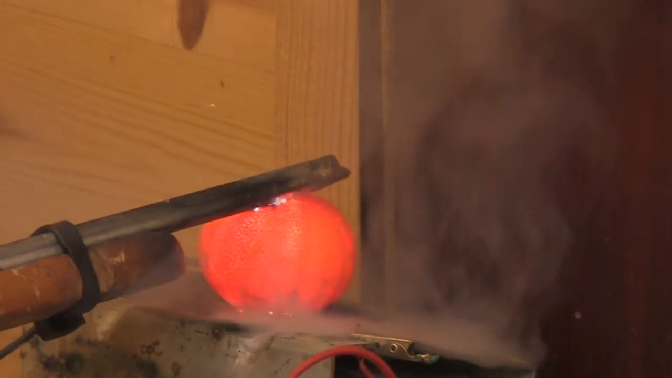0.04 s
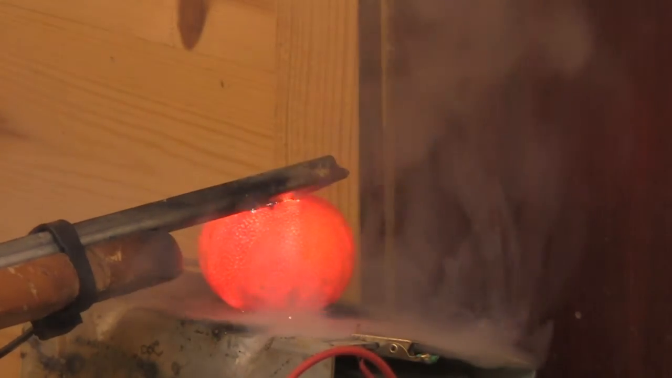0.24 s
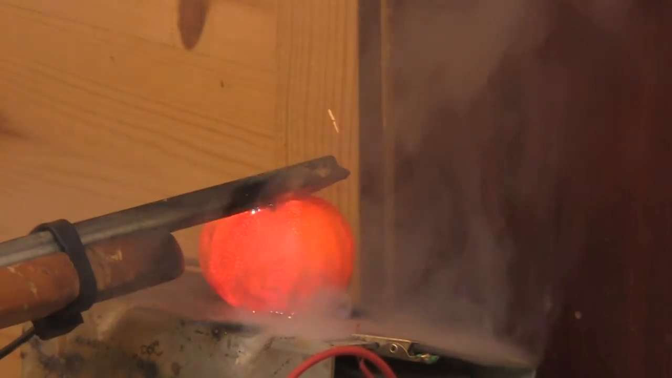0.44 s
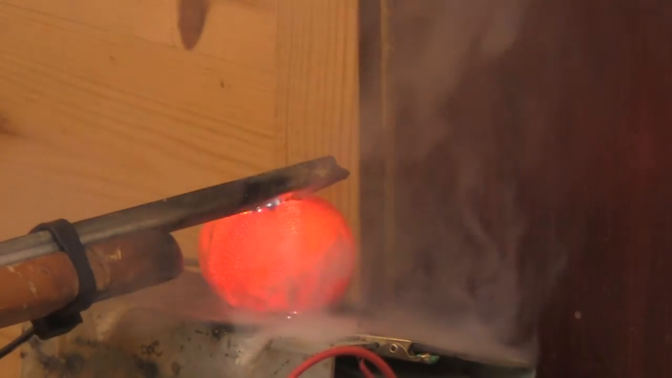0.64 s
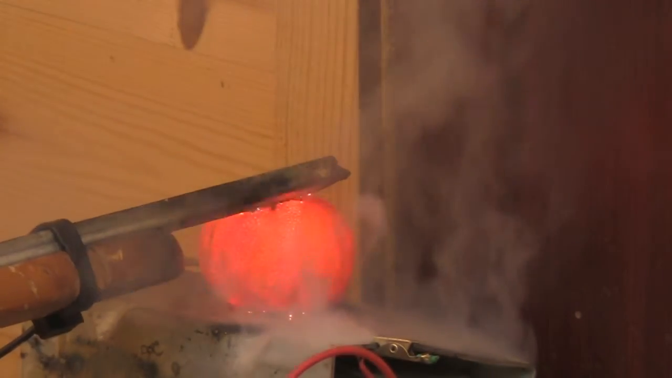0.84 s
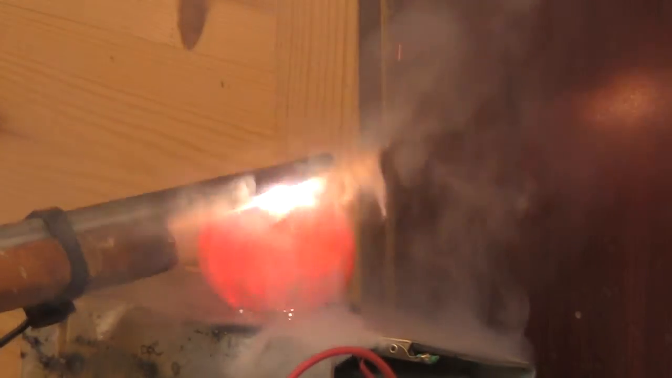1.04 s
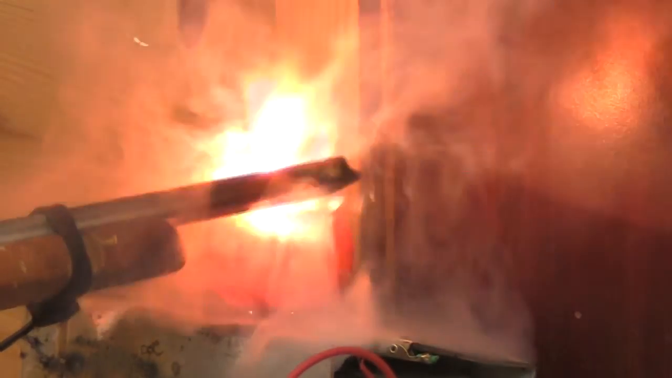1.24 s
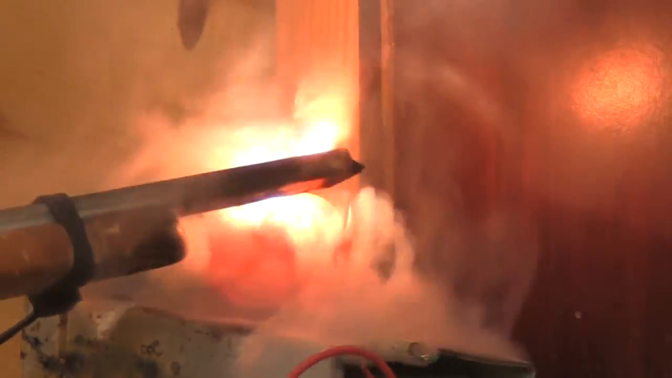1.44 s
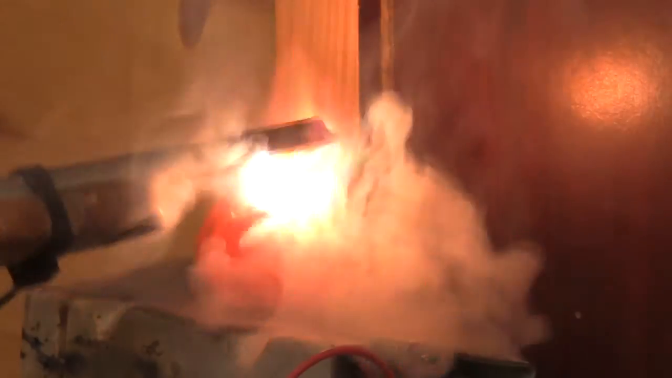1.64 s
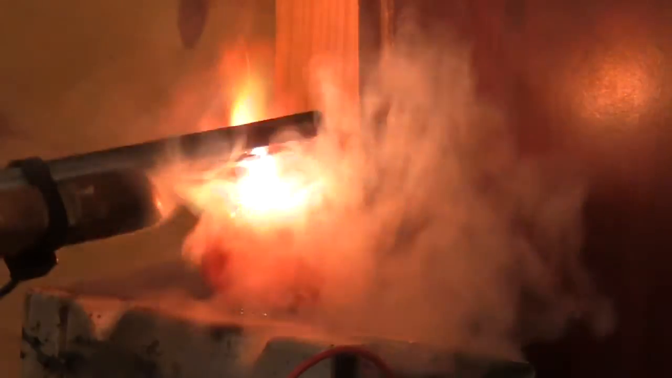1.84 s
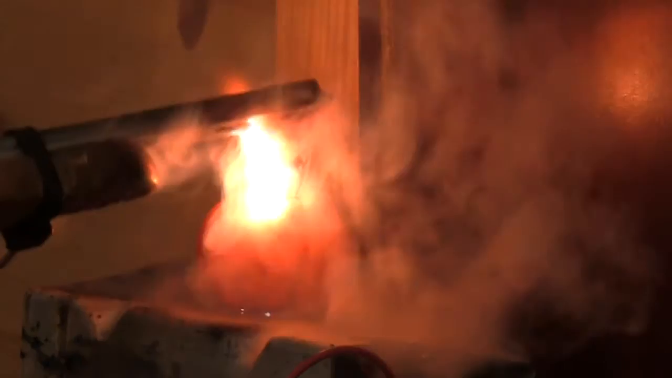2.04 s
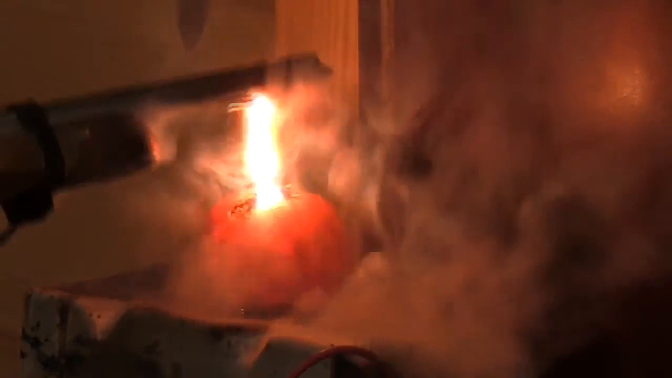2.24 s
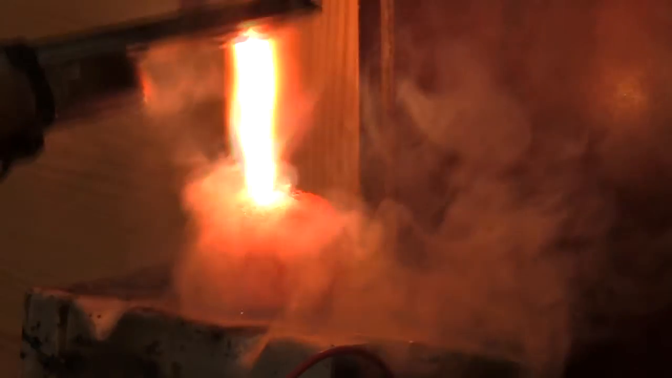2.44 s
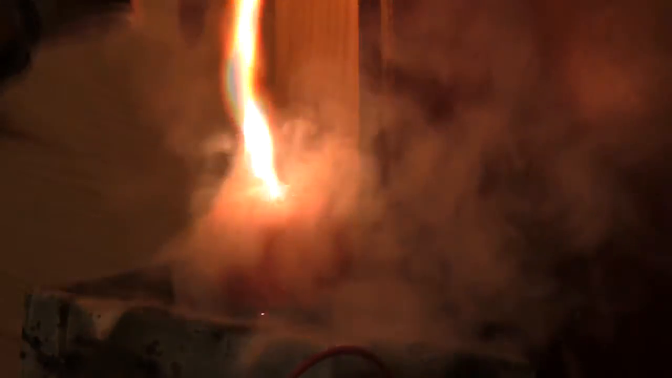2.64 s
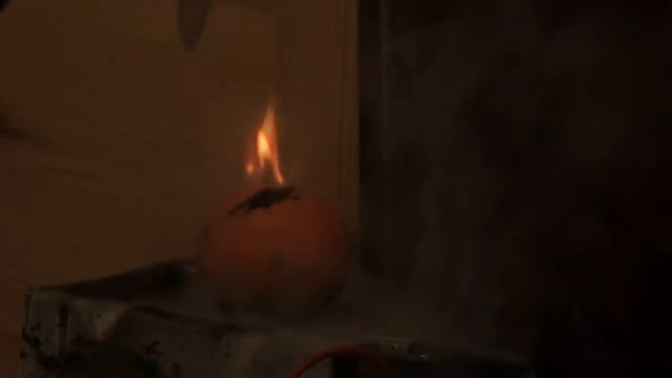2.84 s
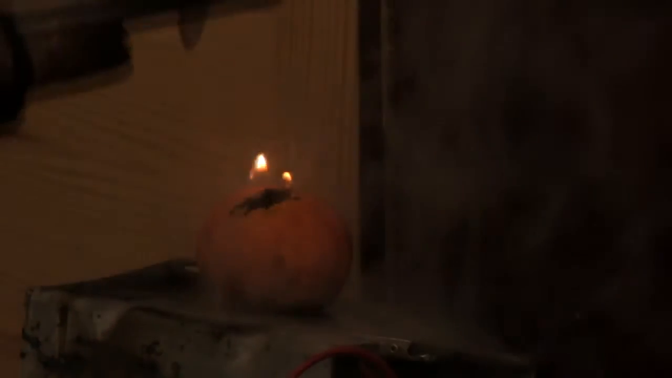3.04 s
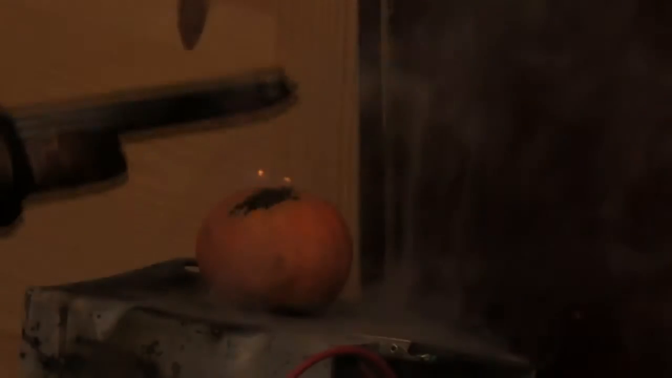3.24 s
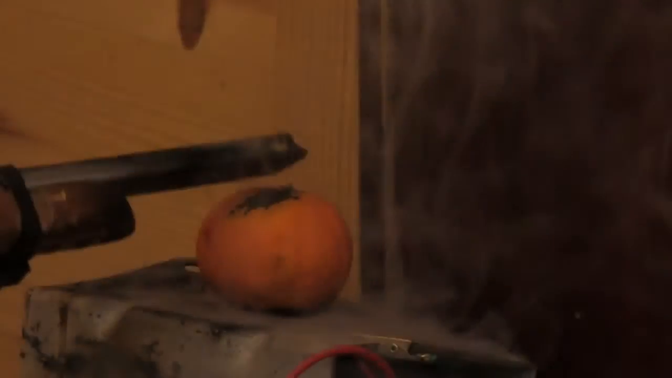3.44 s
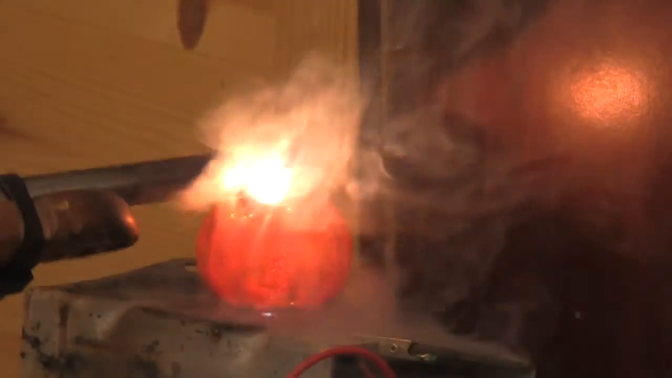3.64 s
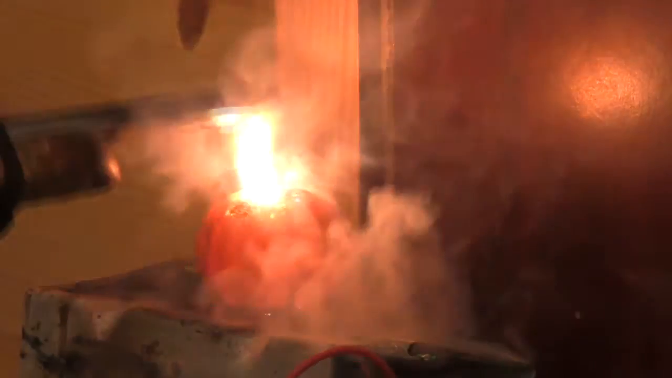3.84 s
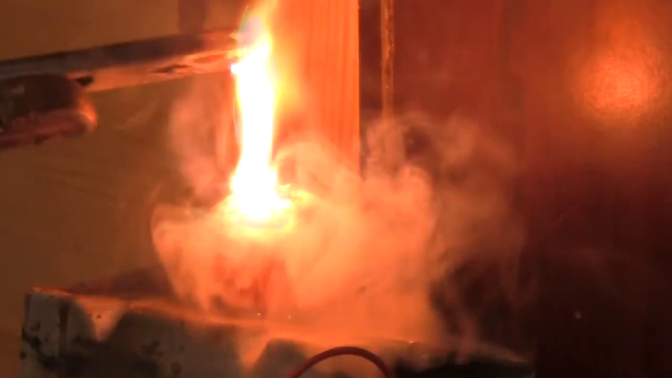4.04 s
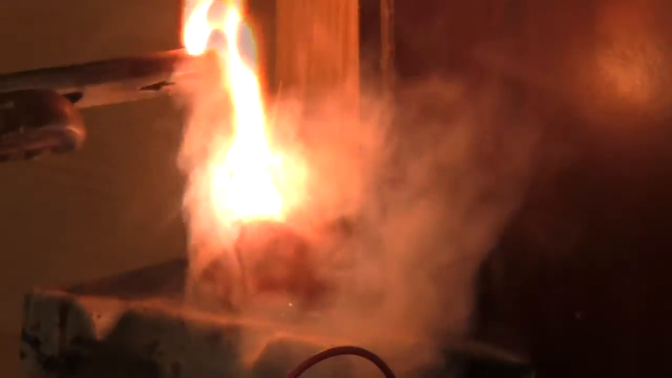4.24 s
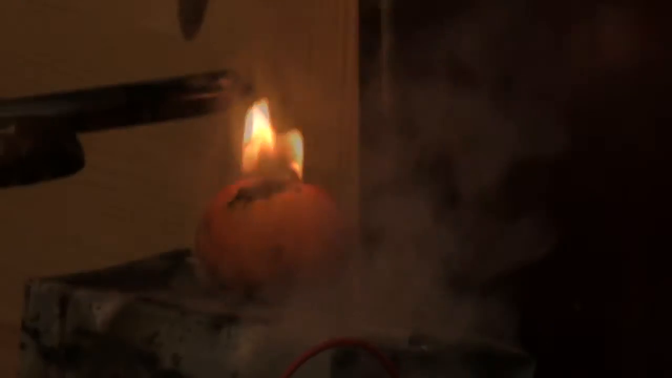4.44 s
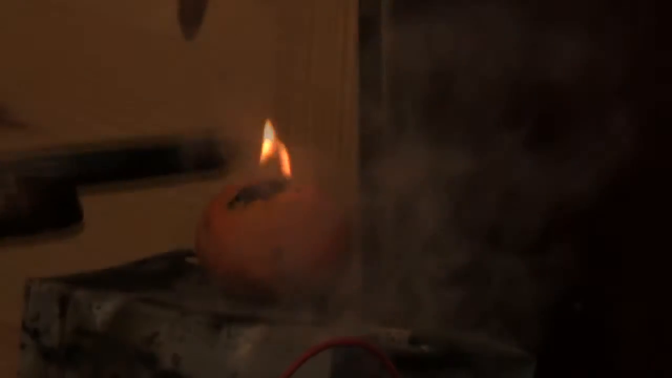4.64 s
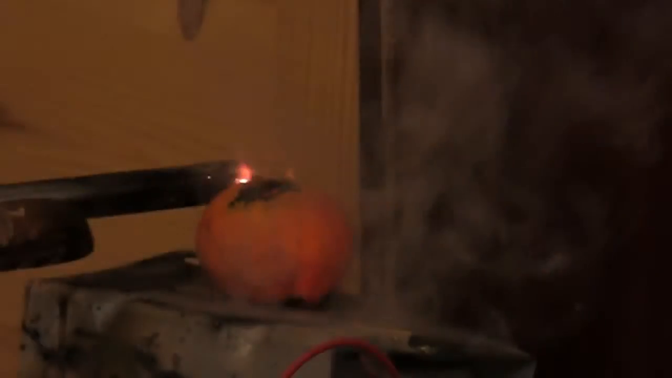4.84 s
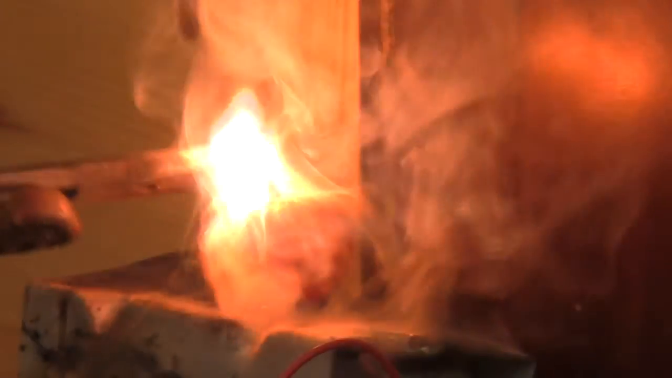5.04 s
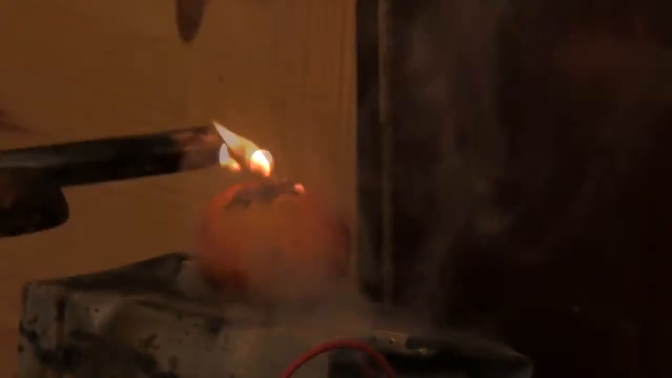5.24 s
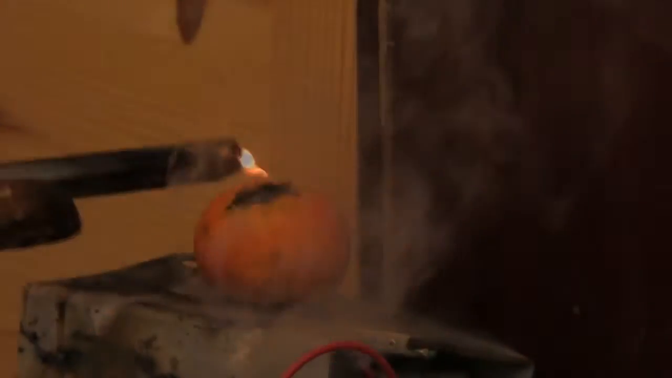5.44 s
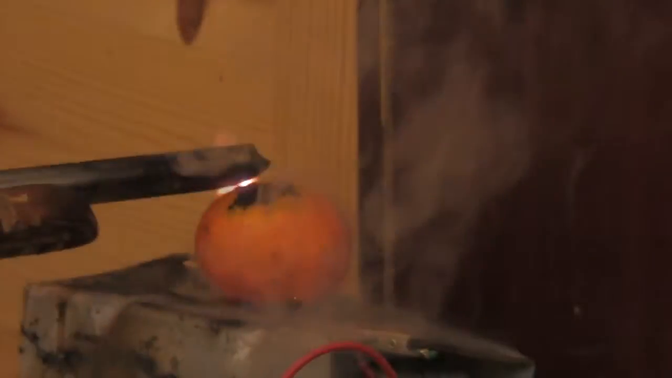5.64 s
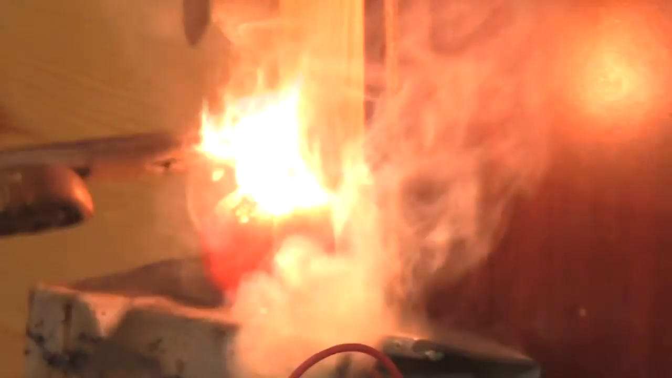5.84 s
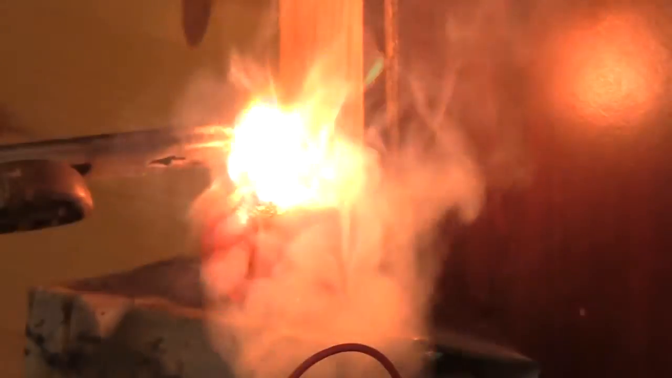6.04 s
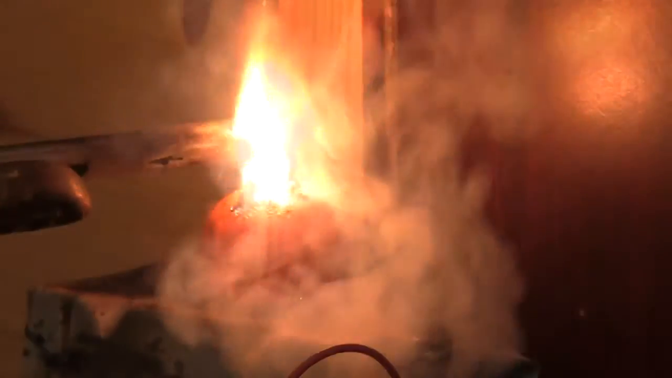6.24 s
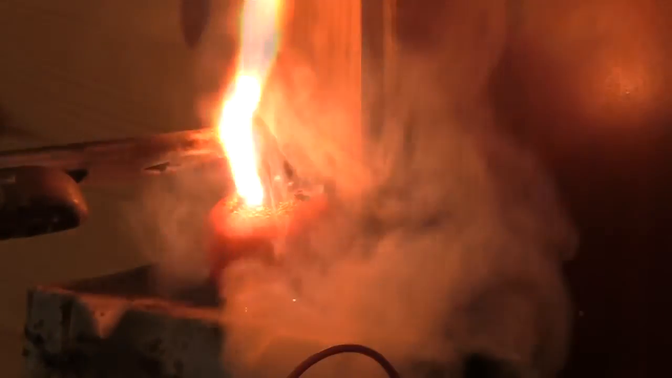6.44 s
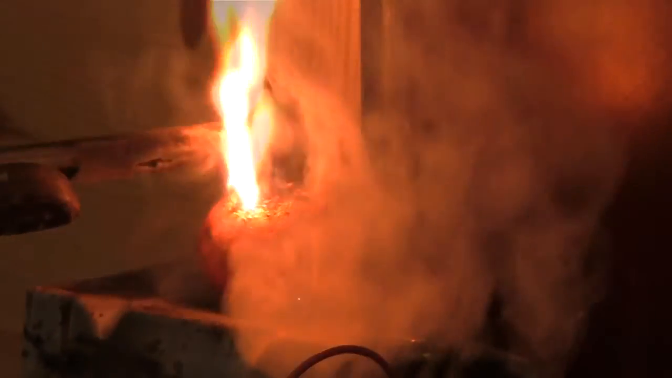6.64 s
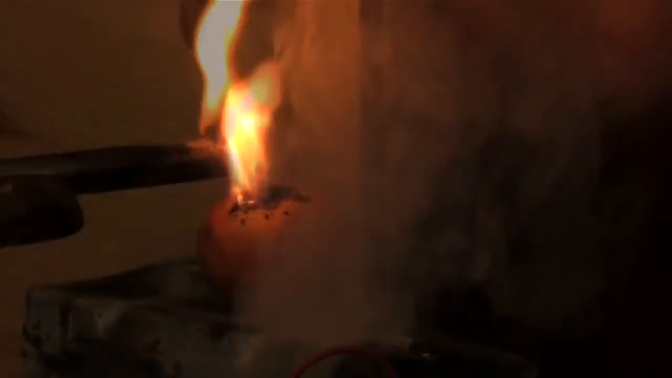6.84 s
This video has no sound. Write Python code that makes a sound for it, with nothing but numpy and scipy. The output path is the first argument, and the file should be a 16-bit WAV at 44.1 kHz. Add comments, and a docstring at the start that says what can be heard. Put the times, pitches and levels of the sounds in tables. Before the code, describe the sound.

A high-voltage arc burns through a dried fruit with a loud, low electric buzz and a bright, spitting sizzle. The flame roars and pockets of steam pop. After a long first burn it cuts out, then strikes three more times in shorter bursts with sharp cracks. In the pauses a transformer hums and the hot fruit fizzes faintly. Heard close up in stereo, in a wooden corner with a short room tail.

```python
"""A loud electric buzz and a spitting sizzle, close up: a mains-fed high-voltage arc burns through a
dried fruit on a bench in a wooden corner. It is drawn out, breaks and strikes again, four burns in all.
The arc buzzes with the current, juice sizzles on each half cycle, the flame roars, steam pockets pop.
In the pauses the transformer hums and the hot fruit steams faintly. Two microphones, a short room tail."""
import sys
import numpy as np
from scipy import signal
from scipy.fft import rfft, irfft, next_fast_len
from scipy.io import wavfile
from scipy.ndimage import uniform_filter1d

SR = 44100
rng = np.random.default_rng(int(sys.argv[2]) if len(sys.argv) > 2 else 0)


def dump(signal):
    """Clip the signal to [-1, 1] and save it as 16-bit WAV at the path in sys.argv[1]."""
    limited = np.clip(np.atleast_2d(signal).T, -1, 1)
    pcm = np.round(limited * 32767).astype(np.int16)
    wavfile.write(sys.argv[1], SR, pcm)


N = 304731
T = np.arange(N) / SR
HZ = np.fft.rfftfreq(4096, 1 / SR)
PADDED = next_fast_len(N + SR)
MAINS_HZ = 49.85

# Burns of the arc: (strike [s], break [s], current at the strike [dB], build-up [s],
# starting length [0 short - 1 drawn out], wait before the pull [s], pull lasts [s],
# base sizzle [dB], base roar [dB], fizz after the break [dB])
BURNS = [(0.0, 2.74, 2.5, 0.01, 0.11, 0.96, 1.7, -29.5, -43, -67),
         (3.59, 4.406, -11, 0.015, 0.26, 0.077, 0.53, -29, -45, -68),
         (4.827, 5.221, -27.5, 0.23, 0.5, 0.2, 0.21, -28, -46, -70.5),
         (5.646, 7.05, -12, 0.22, 0.59, 0.35, 0.61, -28, -48, -70)]
# Pockets of steam that burst and feed the flame: (time [s], pop level [dB], tilt [dB/octave],
# pocket resonance [Hz], pop rise [s], pop t60 [s], flare level [dB], flare t60 [s])
STEAM_POCKETS = [(1.271, -27.5, 1.5, 620, .004, 0.2, -38, 4), (1.325, -21, 3, 1150, 0.092, 0.47, -45, .5),
                 (1.416, -25, -3, 370, .002, 0.084, -61, .5), (1.55, -33, 1, 750, .005, 0.16, -65, .2),
                 (1.632, -29, -1, 730, 0.0073, 0.15, -60, .4),
                 (1.652, -29.5, -0.5, 1198, 0.0068, 0.25, -55, .4),
                 (5.005, -22, -0.5, 1040, 0.0012, 0.14, -32.5, 0.21),
                 (5.647, -25, 1.5, 760, 0.002, 0.12, -42, .22),
                 (5.664, -16.5, 2.5, 1640, 0.0088, 0.098, -37, 0.22),
                 (5.667, -20.5, 9, 2860, 0.0033, 0.047, -70, .1),
                 (5.679, -22.5, -1.5, 338, .008, 0.15, -60, .1),
                 (5.71, -25.5, 2.5, 3300, .002, 0.09, -60, .1),
                 (6.603, -24.5, 2.5, 700, .0014, 0.17, -38, 2.3)]
# Tone of sizzling juice: (frequency [Hz], relative level [dB])
SIZZLE_SPECTRUM = [(100, -33), (400, -24), (1000, -11.5), (2000, -6.5), (3200, -4.5), (4400, -2),
                   (5800, -3), (8000, 1.1), (9800, -2), (11000, -8), (12500, -10), (14000, -26),
                   (15800, -34.5)]
# Tone of spitting juice: (frequency [Hz], relative level [dB])
SPIT_SPECTRUM = [(200, -24), (1500, -16), (2500, -13), (3150, -6), (4000, -6.5), (5800, -22.5), (7800, 1.5),
                 (9600, 3.5), (11000, -10), (15000, -26.5)]
# Decay of the room: (frequency [Hz], t60 [s])
ROOM_DECAY = [(100, 1), (200, 0.29), (700, 0.32), (2000, 0.3), (5000, 0.32), (14000, 0.2)]


def arc(buzz_db=-32.5, short_buzz_db=-4.5, tear_s=0.0091, flare_length=0.91, full_flare_db=-45):
    """Strength of buzz, sizzle and roar, and arc length: it strikes, the rod is pulled away, it breaks."""
    buzz_release_s, sizzle_release_s, roar_release_s = 0.018, 0.012, 0.029
    falter_db = hump(2.733, -6, half_s=.013)  # the arc nearly tears before its first break
    flare = flaring()
    blown_length = flare_length * np.tanh(uniform_filter1d(flare, size=2000) / amp(full_flare_db))
    buzzing, sizzling, roaring, length = np.zeros((4, N))
    for strike, end, strike_db, build_s, start_length, wait_s, pull_s, sizzle_db, roar_db, _ in BURNS:
        age, since_break = T - strike, np.maximum(T - end, 0)
        since_tear = np.maximum(T - end + tear_s, 0)  # it lifts off the juice just before it breaks
        struck = age >= 0
        current_db = strike_db * np.clip(1 - age / build_s, 0, 1) + falter_db
        pulled_length = start_length + (1 - start_length) * np.clip((age - wait_s) / pull_s, 0, 1)
        length = np.where(struck, np.maximum(pulled_length, blown_length), length)
        buzz_gain = amp(buzz_db + current_db + short_buzz_db * (1 - length) ** 2)
        # both partly follow the current; drawing out takes the heat from the juice into the air
        sizzle_gain = amp(sizzle_db + 0.54 * current_db - 4.5 * length)
        roar_gain = amp(roar_db + 0.31 * current_db + 5.5 * length)
        buzzing += struck * np.exp(-since_break / buzz_release_s) * buzz_gain
        sizzling += struck * np.exp(-since_tear / sizzle_release_s) * sizzle_gain
        roaring += struck * np.exp(-since_break / roar_release_s) * roar_gain
    return buzzing, sizzling, np.hypot(roaring, flare), length


def buzz(strength, length, waver_db=-0.27, jitter_cycles=0.0015):
    """The arc heats the air twice a mains cycle; conducting better one way adds odd multiples."""
    # Buzz tones: (mains multiple, short arc [dB], long arc [dB], growth with length [1 even - 3 late])
    harmonics = [(2, -47, -18, 2.5), (3, -27.5, -28.5, 1.9), (4, 0.2, 0.5, 1.9), (5, -10, -17, 1.9),
                 (6, -5.5, -10, 0.78), (7, -31, -21, 2.3), (8, -14, -8.7, 1.6), (10, -14.5, -6, 3.6),
                 (12, -31, -20.5, 1.9), (13, -30.5, -20.5, 1.9), (14, -20, -17.5, 1.9),
                 (18, -25.5, -26.5, 1.9)]
    # The rod sinks in and the arc turns lopsided: (time [s], lift of odd multiples [dB], half width [s])
    sinks = [(0.27, 8, 0.31), (0.75, 9.5, 0.22)]
    drift = jitter_cycles * (wander(40) + wander(8.3))
    lopsided_db = sum(hump(*sink) for sink in sinks)
    out = np.zeros(N)
    for multiple, short_db, long_db, growth in harmonics:
        db = short_db + np.clip(length, 0, 1) ** growth * (long_db - short_db)
        level = strength * amp(db + multiple % 2 * lopsided_db)
        level = ring_on(level, read(ROOM_DECAY, multiple * MAINS_HZ))
        out += level * amp(waver_db * wander(30)) * mains_tone(multiple, drift)
    return out


def juice(strength, length):
    """Sizzle and jets swell at each boil, and froth joins them."""
    # The arc reaches fresh juice: (time [s], sizzle lift [dB], jet lift [dB], froth [dB], half width [s])
    boils = [(0.05, 1.5, 3, -9, 0.16), (1.17, 2, 6, -13, 0.43), (1.56, 0.5, 0.5, -15, 0.17),
             (2.2, 1.5, 3, -14.5, 0.8), (3.645, 0.5, 6, -5.5, 0.2), (5.77, 2, 5, -10.5, 0.095)]
    boiling = strength * amp(sum(hump(s, db, half_s) for s, db, _, _, half_s in boils))
    jetting = strength * amp(sum(hump(s, db, half_s) for s, _, db, _, half_s in boils))
    frothing = strength * sum(hump(s, amp(db), half_s) for s, _, _, db, half_s in boils)
    return sizzle(boiling, length) + jets(jetting, length) + froth(frothing, length)


def sizzle(strength, length, grains_per_s=9000, spread_db=3.0, hiss=0.7):
    """Countless tiny discharges through boiling juice, throbbing with the current."""
    sizes = amp(spread_db * np.minimum(rng.exponential(1, N), 4.5)) * rng.choice([-1, 1], N)
    grains = evened(sizes * (rng.random(N) < grains_per_s / SR)) + hiss * rng.standard_normal(N)
    phase = 2 * np.pi * MAINS_HZ * T - 3.6
    half_cycle_db = (0.24 + 0.47 * length) * np.cos(2 * phase) + np.cos(4 * phase)
    polarity_db = (0.5 + 0.69 * length) * np.cos(phase)
    flutter_db = (1 + 0.56 * length) * wander(160)
    throb = amp(half_cycle_db + polarity_db + flutter_db)
    throb /= np.sqrt(uniform_filter1d(throb ** 2, size=8820))  # keeps the mean power
    return in_corner(strength * throb * evened(grains), SIZZLE_SPECTRUM)


def jets(strength, length, gain_db=-9, spread_db=1.0, weak_half_db=-4, long_arc_db=6, t60=0.026):
    """Each half cycle blows a jet of steam of chance size out of the hole; one polarity blows harder."""
    halves = np.arange(int(2 * MAINS_HZ * N / SR) - 1)
    size, lateness = rng.standard_normal((len(halves), 2)).T
    onsets = ((halves + .05 + .1 * lateness) / (2 * MAINS_HZ) * SR).astype(int)
    jet_db = spread_db * np.minimum(size, 2) + weak_half_db * (halves % 2 == 0)
    kicks = np.zeros(N)
    kicks[np.clip(onsets, 0, N - 1)] = amp(jet_db)
    flow = strength * amp(gain_db + long_arc_db * length) * evened(die_away(kicks, t60))
    return in_corner(flow * rng.standard_normal(N), SPIT_SPECTRUM)


def froth(strength, length):
    """Fresh juice froths up in tiny bubbles: a narrow, high band of sizzle."""
    return colour(sizzle(strength, length), resonance_db(9100, width_hz=2000))


def vent(strength, centre_hz=3200, width_hz=750, drift=0.08, steady_db=-12, flutter_db=2):
    """Steam leaves the charred hole while the arc burns; the resonance shifts as the hole changes shape."""
    # Spurts of steam: (time [s], level relative to the sizzle [dB], half width [s])
    spurts = [(1.13, -10.5, 0.04), (1.556, 0, 0.014), (1.62, -12, 0.57), (1.715, 0.5, 0.015),
              (2.35, -12.5, 0.31)]
    flow = strength * (amp(steady_db) + sum(hump(s, amp(db), half_s) for s, db, half_s in spurts))
    pole = np.exp(-np.pi * width_hz / SR)
    noise = rng.standard_normal(N) + 1j * rng.standard_normal(N)
    band = signal.lfilter([1], np.poly([pole, pole]), noise)
    turns = np.cumsum(centre_hz * (1 + drift * wander(22))) / SR
    hiss = evened((band * np.exp(2j * np.pi * turns)).real)
    return flow * amp(flutter_db * wander(35)) * hiss


def roar(strength, length, gain_db=2.5, short_arc_db=-7, throb=0.82, gust_db=1.03):
    """Turbulent flame round the arc, pushed by each half cycle and stronger as the arc grows."""
    # Tone of the flame: (frequency [Hz], relative level [dB])
    spectrum = [(30, -46.5), (65, -31.5), (98, -6.5), (130, -17), (175, 4.5), (235, 1.5), (280, 3),
                (325, 4), (460, -1.5), (750, -2.5), (1100, -8.5), (1600, -10), (2600, -10.5), (6000, -32)]
    push = 1 + throb * np.cos(2 * np.pi * 2 * MAINS_HZ * T)
    size = amp(gain_db + short_arc_db * np.clip(1 - 2 * length, 0, 1) + gust_db * wander(60))
    return in_corner(strength * size * push * rng.standard_normal(N), spectrum)


def flaring(rise_s=0.0059):
    """Strength of the flame that each burst of steam feeds."""
    return sum(amp(db) * swell(s, rise_s, t60) for s, *_, db, t60 in STEAM_POCKETS)


def fireball(level_db=-47, big_flare_db=-40, t60=0.9):
    """Only a big flare makes a ball of hot gas that throbs twice a mains cycle."""
    size = np.tanh(flaring() / amp(big_flare_db)) ** 3
    return amp(level_db) * ring_on(size, t60) * mains_tone(2)


def pops(pocket_db=7, pocket_octaves=0.21, corner_share=0.84):
    """Bursts of steam, each coloured by the size of its pocket."""
    # Tone common to the pops: (frequency [Hz], relative level [dB])
    spectrum = [(40, -29), (130, -2.5), (320, 0), (500, -1), (750, -4.5), (1100, -7), (1650, -7),
                (2100, -9), (3000, -8.5), (4500, -15.5), (6000, -12), (14000, -38)]
    common_db = read(spectrum, HZ) + corner_share * corner_db()
    octaves = np.log2(np.clip(HZ, 200, 3500))
    out = np.zeros(N)
    for s, db, tilt_db, hz, rise_s, t60, *_ in STEAM_POCKETS:
        ring_db = pocket_db * np.exp(-(np.log2((HZ + 1) / hz) / pocket_octaves) ** 2)
        puff = amp(db) * swell(s, rise_s, t60) * rng.standard_normal(N)
        out += colour(puff, common_db + tilt_db * octaves + ring_db)
    return out


def snaps(t60=0.011):
    """Short bright spits of juice."""
    # The loudest spits: (time [s], level [dB])
    spits = [(1.112, -16), (1.476, -16), (1.494, -19), (1.536, -19), (1.5553, -20), (2.6417, -18),
             (2.761, -24.5), (3.599, -20), (3.602, -17), (3.6385, -15), (3.658, -18), (3.701, -23),
             (4.5346, -49), (4.816, -35), (4.867, -25), (4.966, -20.5), (4.987, -15), (5.65, -13.5),
             (5.667, -16), (5.688, -20), (5.708, -22), (5.729, -24)]
    return in_corner(sum(amp(db) * burst(s, t60) for s, db in spits), SPIT_SPECTRUM)


def cracks(t60=0.0046):
    """Single sparks, some thin and some full, that reach the microphones with no room tail."""
    # Dry sparks: (time [s], level [dB], tilt [dB/octave])
    sparks = [(1.377, -21, -3), (1.418, -22, -5), (4.866, -32, -3), (4.987, -24, -2), (5.007, -18, -5),
              (5.731, -23, -1), (5.7475, -8.5, -1), (6.605, -11, -4.5)]
    # Tone of a bare spark: (frequency [Hz], relative level [dB])
    spectrum = [(40, -50), (200, -18), (1200, -7), (2200, -8), (3300, -2), (5500, -8), (8800, 10),
                (12500, -5), (16000, -35)]
    common_db = read(spectrum, HZ) + corner_db()
    octaves = np.log2(np.maximum(HZ, 700))
    return sum(colour(amp(db) * burst(s, t60), common_db + tilt * octaves) for s, db, tilt in sparks)


def sputter(t60=0.025, spread_db=2):
    """Where the rod only grazes the peel, a thin spark jumps on every half cycle."""
    # Runs of sparks: (start [s], end [s], first level [dB], last level [dB])
    runs = [(0.003, 1.25, -29, -35), (4.826, 4.86, -39, -36), (4.877, 4.96, -31, -35)]
    # Tone of a thin spark: (frequency [Hz], relative level [dB])
    spectrum = [(200, -17), (1200, -8.5), (3300, -15), (6000, -9), (8000, -2), (10300, 5.5), (11500, 0.5),
                (13000, -11.5), (15800, -32)]
    kicks = np.zeros(N)
    for start, end, first_db, last_db in runs:
        times = np.arange(start, end, 1 / (2 * MAINS_HZ))
        spark_db = np.linspace(first_db, last_db, len(times)) + spread_db * rng.standard_normal(len(times))
        kicks[(times * SR).astype(int)] = amp(spark_db)
    return in_corner(die_away(kicks + 1e-12, t60) * rng.standard_normal(N), spectrum)


def steam(flutter_db=1.5, rustle_db=1.5, puff_fizz_db=-17):
    """The hot juice fizzes on after each break, with a few soft rustling puffs."""
    # Puffs in the pauses: (time [s], level [dB], centre [Hz], width [Hz], rise [s], t60 [s])
    puffs = [(3.005, -52, 1190, 1050, 0.032, 1.3), (3.24, -60.5, 1300, 1200, 0.06, 1.0),
             (3.405, -62.5, 1700, 905, 0.008, 0.19), (4.55, -61, 1785, 1410, 0.038, 4.6),
             (5.494, -57, 3760, 1600, .001, 0.13)]
    fizz = colour(rng.standard_normal(N), read(SIZZLE_SPECTRUM, HZ))
    out = fizz * np.max([amp(db) * swell(end, rise_s=.02, t60=3.7) for _, end, *_, db in BURNS], axis=0)
    for s, db, hz, width_hz, rise_s, t60 in puffs:
        hiss = colour(rng.standard_normal(N), resonance_db(hz, width_hz)) + amp(puff_fizz_db) * fizz
        out += amp(db + rustle_db * wander(140)) * swell(s, rise_s, t60) * hiss
    return amp(flutter_db * wander(92)) * out


def transformer(length, waver_db=1, loaded_db=-13):
    """The iron core hums all the while, less when a short arc pulls the voltage down."""
    # Idle hum: (mains multiple, level [dB])
    harmonics = [(2, -61), (3, -69), (4, -59), (7, -88), (8, -64.5), (10, -66.5), (14, -84), (20, -73.5)]
    hum = sum(amp(db + waver_db * wander(29)) * mains_tone(multiple) for multiple, db in harmonics)
    lit = sum((T >= strike) & (T <= end) for strike, end, *_ in BURNS)
    load = uniform_filter1d(lit * np.clip(1 - length, 0, 1), size=2000)
    return amp(loaded_db * load) * hum


def room_tone(level_db=-60, apart_db=-12):
    """Soft room noise, mostly shared by both microphones."""
    # The quiet room: (frequency [Hz], relative level [dB])
    spectrum = [(20, -15), (45, -8), (60, 14.5), (80, -18), (130, 3.5), (300, 1.5), (700, -3), (1200, -9),
                (2500, -14), (6000, -22.5), (9000, -27.5), (11000, -38), (15000, -37)]
    left, right, shared = (colour(rng.standard_normal(N), read(spectrum, HZ)) for _ in range(3))
    return amp(level_db) * (shared + amp(apart_db) * np.array([left, right]))


def corner_db():
    """The lift that the bench and the wooden corner give to each frequency."""
    # Their resonances: (frequency [Hz], width [Hz], lift [dB])
    resonances = [(327, 32, 4), (423, 15, 5.6), (567, 30, 8), (645, 24, 7.5), (723, 35, 7.5),
                  (823, 32, 6.3), (906, 57, 6.4), (1135, 115, 9.4), (1335, 125, 7), (1558, 39, 3.4),
                  (1789, 90, 4), (2072, 48, 7.8), (2397, 45, 4), (2589, 56, 4.6), (3207, 811, 3.8),
                  (6722, 376, 2.7), (9368, 1349, 1.3)]
    return sum(db * .5 ** ((2 * (HZ - hz) / width) ** 2) for hz, width, db in resonances)


def in_corner(x, spectrum):
    """A source's own spectrum, lifted at the resonances of the corner."""
    return colour(x, read(spectrum, HZ) + corner_db())


def room(x, blend_hz=1.7, count=5):
    """A short, dense room tail, blended from several sets of reflections so that it sounds even."""
    phase = 2 * np.pi * blend_hz * T
    shares = np.maximum([np.cos(phase + 2 * np.pi * k / count) for k in range(count)], 0) ** 2
    shares /= shares.sum(0)
    shares /= np.sqrt(.5 + .5 * (shares ** 2).sum(0))  # direct sound adds in step, reflections in power
    return irfft(sum(rfft(x * share, PADDED) * paths(wet_db=-1) for share in shares), PADDED)[:, :N]


def near(x):
    """A dry, close sound with only a little room tail."""
    return irfft(rfft(x, PADDED) * paths(wet_db=-8), PADDED)[:, :N]


def paths(wet_db):
    """Frequency response from bench to microphones: direct sound and a short dense tail."""
    # Stereo width, greatest in the treble: (frequency [Hz], side minus mid [dB])
    width = [(100, -28.5), (300, -29), (600, -14), (1200, -18), (2800, -16.5), (5500, -4), (9000, -7),
             (13000, 5.5)]
    taps = rng.standard_normal((2, SR // 2)) * (rng.random((2, SR // 2)) < .15)
    hz, t, frames = signal.stft(taps, SR, nperseg=256)
    decay = np.exp(-np.log(1000) * t / read(ROOM_DECAY, hz)[:, None])
    tails = signal.istft(frames * decay, SR, nperseg=256)[1]
    mid, side = rfft(tails / np.linalg.norm(tails, axis=1, keepdims=True), PADDED)
    mid = (1 + amp(wet_db) * mid) / np.hypot(1, amp(wet_db))
    side *= amp(read(width, np.fft.rfftfreq(PADDED, 1 / SR)))
    return np.array([mid + side, mid - side])


def ring_on(strength, t60):
    """The level of a low tone swells within a few cycles and lingers in the room."""
    fall = np.log(1000) * T / t60
    held = np.exp(np.maximum.accumulate(np.log(strength + 1e-9) + fall) - fall)
    return uniform_filter1d(held, size=400)


def standing_waves(x, side_db=-27):
    """Standing waves bring low tones to the two microphones slightly out of step."""
    return x + np.outer([-1, 1], amp(side_db) * signal.hilbert(x).imag)


def mains_tone(multiple, drift=0):
    """A mains multiple at unit rms: the lowest line up as a pulse, the room scatters the higher ones."""
    turns = multiple * (MAINS_HZ * T - 1 / 4 + drift) + rng.random() * (multiple > 6)
    return -np.sqrt(2) * np.cos(2 * np.pi * turns)


def amp(db):
    """Decibels to gain."""
    return 10 ** (np.asarray(db) / 20)


def evened(x):
    """Scaled to unit rms."""
    return x / np.sqrt(np.mean(x ** 2) + 1e-20)


def read(points, hz):
    """A curve joined by straight lines over log frequency."""
    f, value = np.transpose(points)
    return np.interp(np.log(hz + 1), np.log(f + 1), value)


def wander(per_s):
    """Smooth random motion at unit rms."""
    return evened(signal.resample(rng.standard_normal(int(per_s * N / SR) + 2), N))


def colour(x, level_db):
    """Minimum-phase filter of unit power with the given shape over HZ."""
    log_gain = np.log(evened(amp(level_db)))
    mirrored = np.concatenate([log_gain, log_gain[-2:0:-1]])
    taps = np.fft.ifft(np.exp(np.conj(signal.hilbert(mirrored)))).real
    return signal.oaconvolve(x, taps[:len(HZ)])[:N]


def resonance_db(centre_hz, width_hz):
    """One broad resonance with steep skirts."""
    return -20 * np.log10(1 + (2 * (HZ - centre_hz) / width_hz) ** 2)


def burst(s, t60):
    """Noise that starts at once and dies away."""
    return (T >= s) * np.exp(-np.log(1000) * abs(T - s) / t60) * rng.standard_normal(N)


def die_away(kicks, t60):
    """An exponential tail on every kick."""
    return signal.lfilter([1], [1, -np.exp(-np.log(1000) / t60 / SR)], kicks)


def swell(s, rise_s, t60):
    """A straight rise from the given moment, dying away all the while."""
    return np.clip((T - s) / rise_s, 0, 1) * np.exp(-np.log(1000) * abs(T - s) / t60)


def hump(s, size, half_s):
    """A bell-shaped passing change."""
    return size * np.exp(-((T - s) / half_s) ** 2)


def scene():
    """The arc and the fruit in their corner, over the hum of the transformer."""
    buzzing, sizzling, roaring, length = arc()
    noises = juice(sizzling, length) + vent(sizzling) + roar(roaring, length)
    noises += sputter() + snaps() + steam()
    tones = buzz(buzzing, length) + fireball() + transformer(length)
    return room(noises) + near(pops()) + cracks() + standing_waves(tones) + room_tone()


def record(dry, cutoff_hz=15800):
    """The treble leans to the right microphone, and the very top is cut off."""
    # Balance of the pair: (frequency [Hz], left minus right [dB])
    balance = [(60, 4), (110, -0.5), (200, -0.5), (380, 1.5), (700, 1), (1290, 1), (2380, -1), (4400, -1.5),
               (8120, -4), (15000, -11)]
    lean = amp(np.outer([.5, -.5], read(balance, np.fft.rfftfreq(N, 1 / SR))))
    leaning = irfft(rfft(dry) * lean / lean.mean(0), N)
    lowpass = signal.firwin(511, cutoff_hz, window=("kaiser", 9), fs=SR)
    return signal.oaconvolve(leaning, lowpass[None], "same")


dry = scene()
out = record(dry)
dump(out)
```